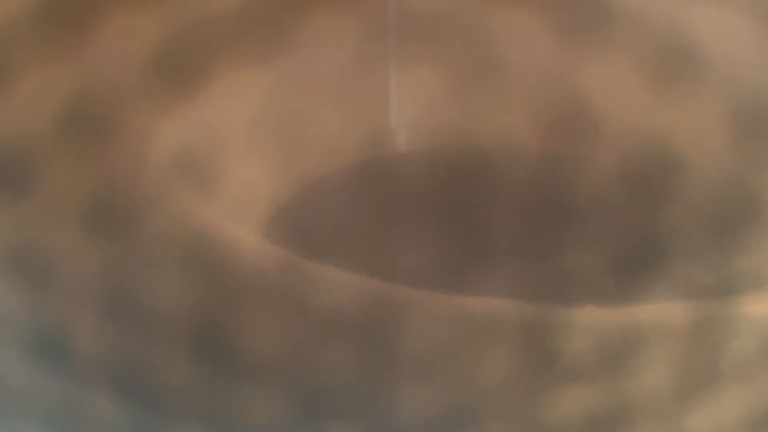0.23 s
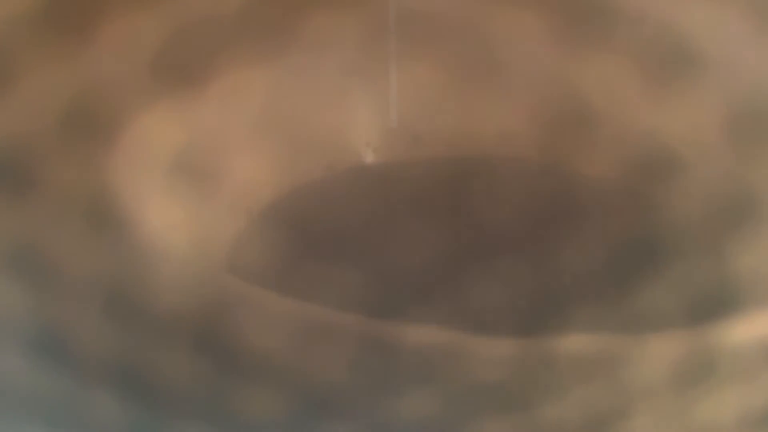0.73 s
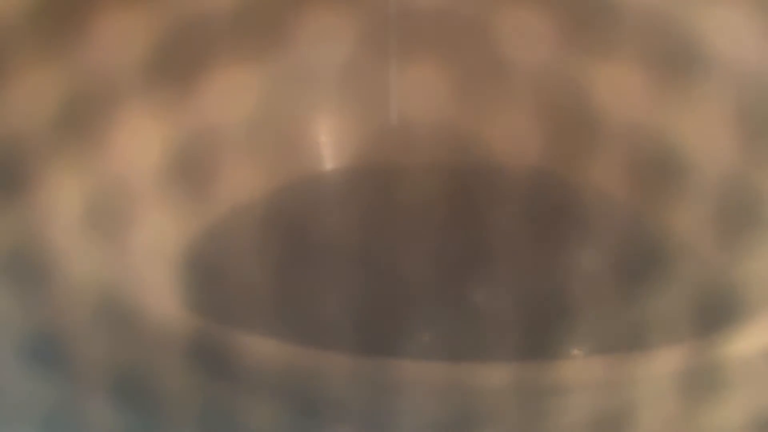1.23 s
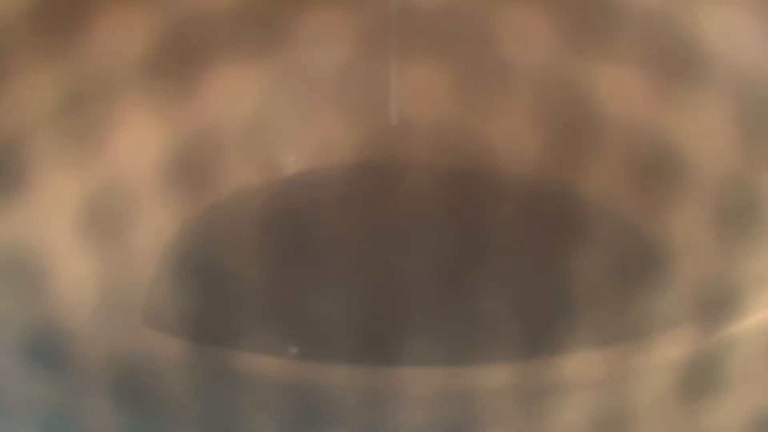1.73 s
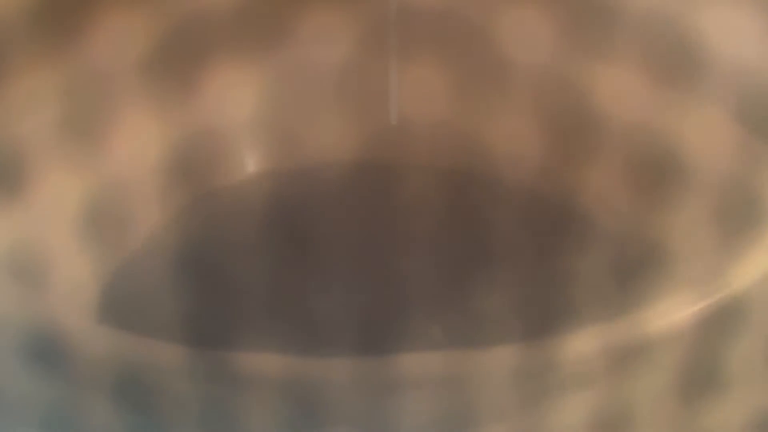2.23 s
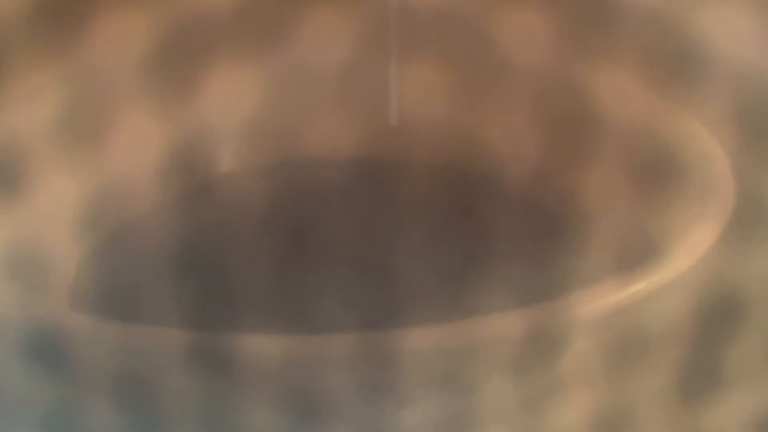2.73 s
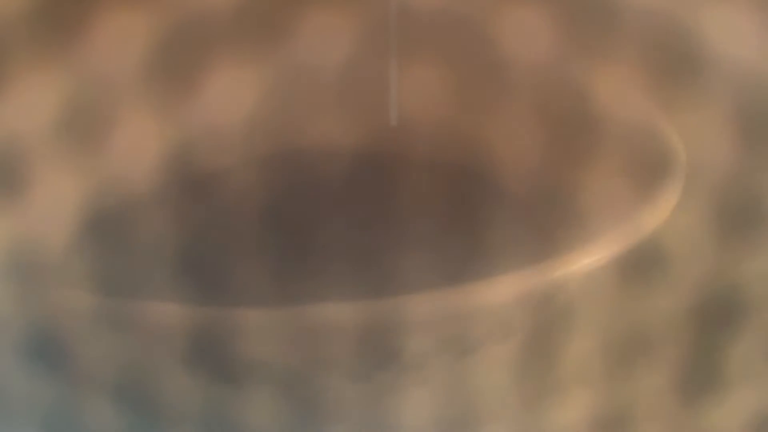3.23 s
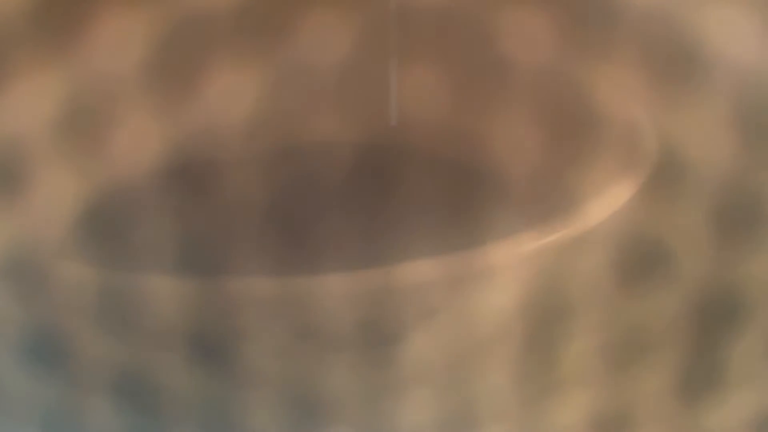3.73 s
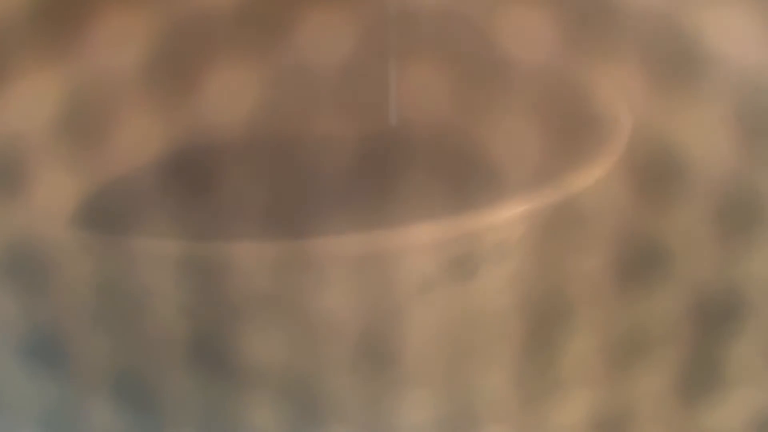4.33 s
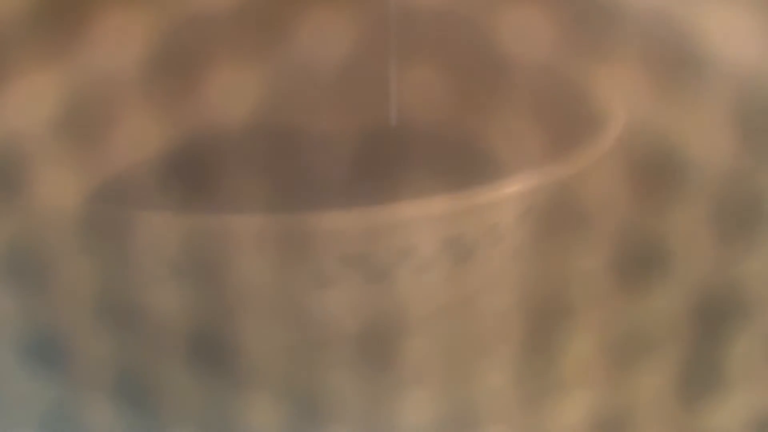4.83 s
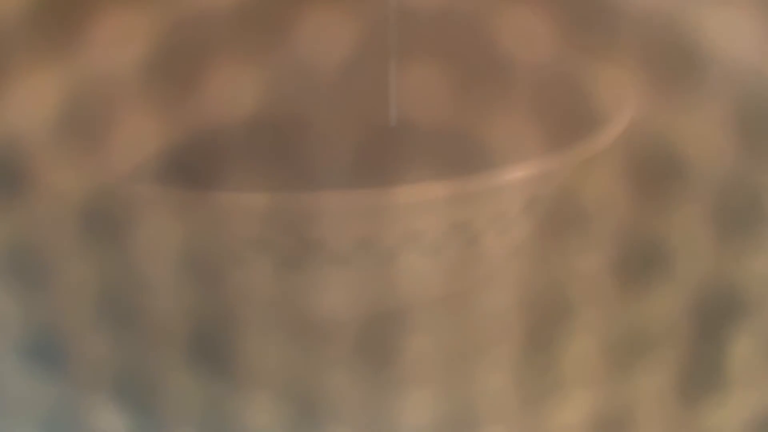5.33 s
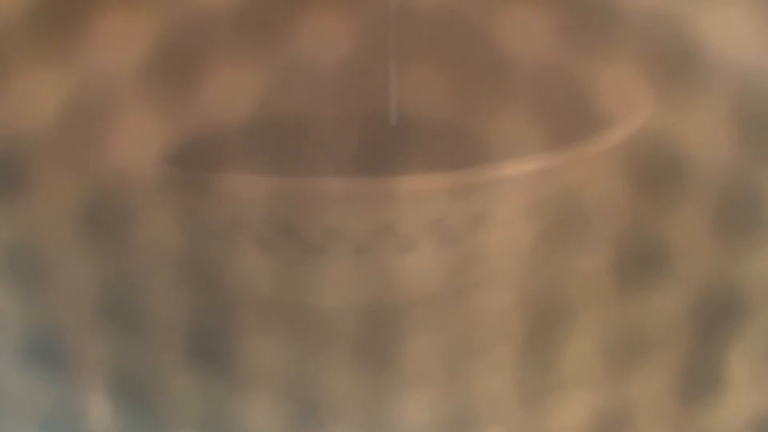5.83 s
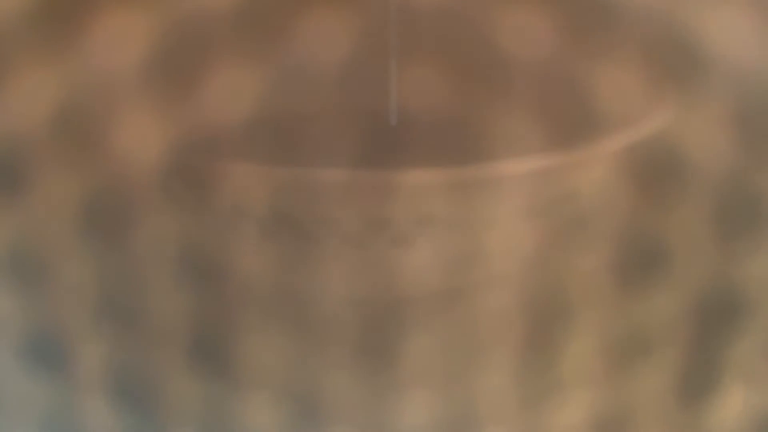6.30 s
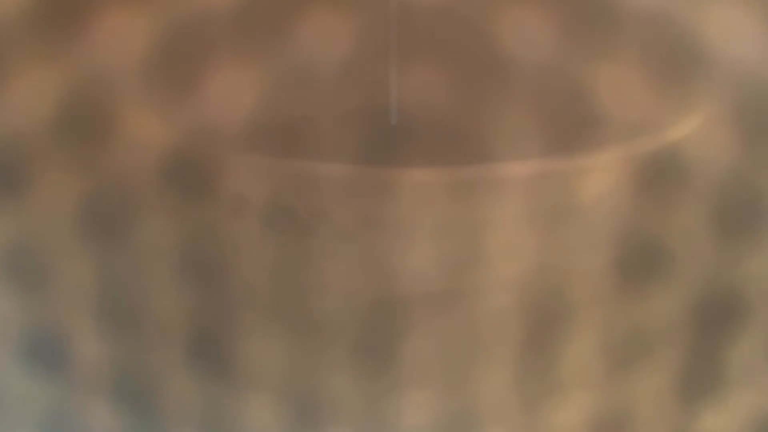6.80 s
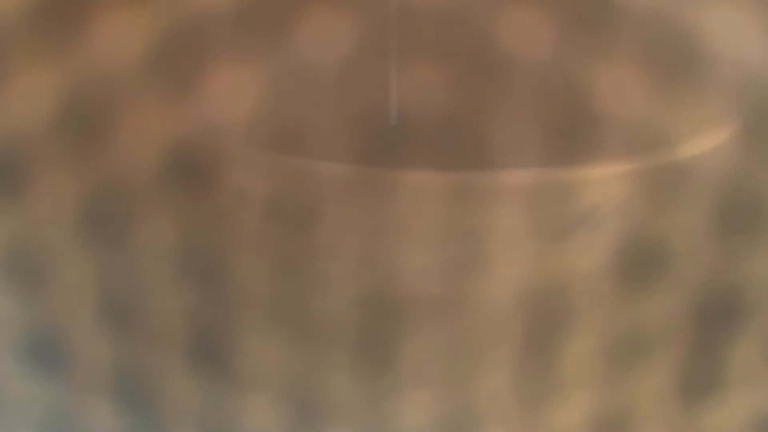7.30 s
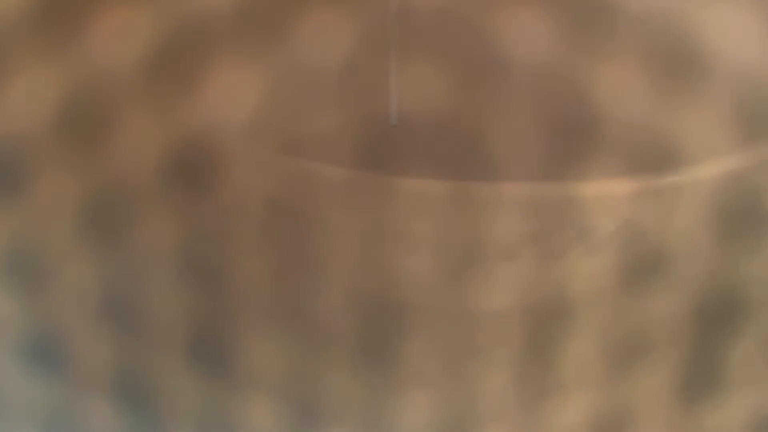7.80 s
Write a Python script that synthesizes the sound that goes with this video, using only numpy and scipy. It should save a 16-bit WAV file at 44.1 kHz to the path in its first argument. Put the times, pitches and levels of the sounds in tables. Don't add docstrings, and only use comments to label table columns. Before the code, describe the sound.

A running microwave oven hums low and steady up close, its fan droning and fluttering against the buzz, with a soft turntable whir and rushing vent air.

```python
import sys
import numpy as np
from scipy import signal
from scipy.io import wavfile
from scipy.ndimage import uniform_filter1d

SR = 44100
rng = np.random.default_rng(int(sys.argv[2]) if len(sys.argv) > 2 else 0)


def makeup_ratio(level_db):
    decades = np.asarray(level_db, float) / 20
    return 10 ** decades


def store_pcm(level_fs):
    pcm = np.round(np.clip(level_fs, -1, 1) * 32767).astype(np.int16)
    wavfile.write(sys.argv[1], SR, np.atleast_2d(pcm).T)


N = 355225

MAINS_HZ = 60.0115
PANEL_SIDE_DB, PANEL_LEAD = 1.5, .4

# time_s, speed_rpm
FAN_SPEED = [
    (0, 2267.68),
    (3.4, 2268.24),
    (4.2, 2274.44),
    (8.06, 2252.87),
]
# shaft_multiple, level_db (rms)
SHAFT_TONES = [(3, -46), (5, -53.7), (8, -47.1), (12, -53.9), (16, -61.9), (20, -68), (24, -66)]
# mains_multiple, shaft_multiple, level_db (rms)
PANEL_TONES = [(2, 4, -43.4), (4, 4, -53), (6, 4, -61), (2, 8, -56.2), (-2, 8, -52.3), (4, -4, -51.2),
               (1, 4, -54.4), (1, 2, -48.7), (2, 1, -50.4), (4, 1, -52.1), (2, 3, -49.8), (4, 2, -54.4),
               (-1, 6, -47.5), (-3, 8, -54.4)]
# frequency_hz, left_over_right_db, likeness (0-1), left_lead_rad
PORT_RESPONSE = [(25.3, 0, .45, 0), (45.7, 0.5, 1, -1.5), (141, -0.5, 1, -0.16), (350, -1.5, 0.7, 0),
                 (750, 1.5, 0.4, -0.2), (1300, 0.5, 0.3, 0), (2100, 0.5, 1, -0.65), (2940, 5.5, 0.6, 0.64),
                 (4500, 2.5, 0.8, 0), (6160, 5.5, 0.6, -0.8), (6770, 1.5, 0.9, 3.5), (7560, 0, 0.7, 3.5),
                 (9350, -1, 0.2, 1.7), (10500, 3, 1, 0), (12500, -1.5, 0.9, 0), (13800, -0.5, 0.8, 2)]


def mains(t):
    start_turns = .216
    return MAINS_HZ * t + start_turns


def shaft(t):
    start_turns = -.016
    rpm = np.interp(t, *np.transpose(FAN_SPEED))
    return np.cumsum(rpm) / 60 / SR + start_turns


def offset(a, b):
    panel_delay_s = .0045
    order, free = a / 2 + b / 4, rng.random()
    if b == 0 and a < 4:
        return (a - 2) / 10
    if a % 2 or b % 4 or min(a, b) < 0 or order > 3:
        return free
    hz = a * MAINS_HZ + b * FAN_SPEED[0][1] / 60
    return (order > 1) * (.35 * order - .18 - panel_delay_s * hz)


def drift(top_hz):
    t = np.arange(0, N, 256) / SR
    f = np.geomspace(top_hz / 12, top_hz, num=8)[:, None]
    sines = np.sin(2 * np.pi * (f * t + rng.random(f.shape)))
    x = (sines / np.sqrt(f)).sum(0)
    return np.interp(np.arange(N) / SR, t, x / x.std())


def tone(turns, db, side_db, lead):
    half = np.array([[.5], [-.5]])
    wave = np.cos(2 * np.pi * turns + lead * half)
    return np.sqrt(2) * makeup_ratio(db + side_db * half) * wave / np.cos(min(abs(lead), 2) / 2)


def read(points, hz):
    f, *columns = np.transpose(points)
    return [np.interp(np.log(hz + 1), np.log(f + 1), c) for c in columns]


def density(hz):
    # frequency_hz, density_db_per_hz
    vent_air = [(22, -84.5), (38, -70.5), (62, -62), (100, -62), (135, -54), (200, -64.5), (640, -70.5),
                (1000, -78.5), (2600, -82), (3100, -89.5), (4100, -93.5), (4700, -98.5), (5600, -100),
                (6200, -104)]
    # frequency_hz, density_db_per_hz
    top_hiss = [(6200, -105), (7000, -107), (8400, -109), (9500, -110), (10500, -114), (12250, -117),
                (12600, -128), (14000, -132), (15500, -122.5), (16500, -130)]
    # frequency_hz, width_hz, gain_db
    cabinet_modes = [(330, 44, 0), (450, 26, 1.5), (496, 21, -6.5), (710, 21, -3.5), (739, 34, -7.5),
                     (870, 91, 2.5), (1020, 22, -3), (1140, 110, 2), (1260, 47, -2.5), (1630, 74, 3),
                     (1718, 70, -5), (2290, 80, -1.5)]
    db = read(vent_air + top_hiss[1:], hz)[0]
    return db + sum(g / (1 + ((hz - f) / w) ** 2) for f, w, g in cabinet_modes)


def struck(at, force, modes, bias):
    u, out = np.arange(5000) / SR, np.zeros((2, N))
    for hz, db, t60 in modes:
        chance, blows = rng.standard_normal((len(at), 4)).T, np.zeros((2, N))
        uneven = 1 + 0.29 * chance[1] + 0.3 * chance[2:]
        blows[:, at] = force * np.sign(chance[0] + bias) * uneven
        soft_onset = 1 - np.exp(-u / 0.0035)
        ring = makeup_ratio(db - 60 * u / t60) * np.sin(2 * np.pi * hz * u) * soft_onset
        out += signal.oaconvolve(blows, ring[None])[:, :N]
    return out / out.std()


def transformer(t):
    # mains_multiple, level_db (rms), left_over_right_db, left_lead_rad
    hum_tones = [(1, -36.9, -1.0, 0.1), (2, -19.7, 0.5, 0.5), (3, -39.7, -0.8, 0.0), (4, -33.9, 4.8, 0.3),
                 (5, -55.6, 2.0, 0.2), (6, -49.6, 3.6, 0.7), (7, -55.2, 3.0, 0.8), (8, -60, 8.8, -1.8),
                 (9, -54.8, 6.8, -1.2), (10, -53.3, 1.4, -0.1)]
    # mains_multiple, swing_db, weakest_s, creep_db_per_s
    dish_load = [(4, .4, 3.5, .45), (6, 4.5, 3.8, .4), (8, 4.5, 4.5, 0), (10, 1.5, 5.4, 0)]
    swing_s = 7.0
    load_db = {}
    for k, swing_db, weakest_s, creep_db in dish_load:
        swing = swing_db * np.cos(2 * np.pi * (t - weakest_s) / swing_s)
        load_db[k] = creep_db * (t - t.mean()) - swing
    out = 0
    for k, db, side_db, lead in hum_tones:
        waver_db = .1 * (k != 2) * min(k, 9) * drift(1.5)
        out = out + tone(k * mains(t) + offset(k, 0), db + waver_db + load_db.get(k, 0), side_db, lead)
    return out


def buzz(t):
    # mains_multiple, level_db (rms)
    strong_overtones = [(11, -70), (12, -66.2), (14, -65.0), (16, -62.1), (18, -66.7), (22, -68.1),
                        (24, -68.1), (26, -61.3), (32, -66.0), (36, -65.9), (38, -69.1), (44, -70.4),
                        (64, -75), (70, -79)]
    # from_multiple, to_multiple, gain_db
    singing_sheet = (98, 108, 5.0)
    k = np.arange(11, 200)
    even = k % 2 == 0
    chance = rng.standard_normal((len(k), 4))
    db = density(k * MAINS_HZ) + 6.9 + 2.6 * even + 3.0 * np.minimum(chance[:, 0], 1) - 3.7 * (k > 108)
    low, high, gain_db = singing_sheet
    db += gain_db * even * (k > low) * (k < high)
    for multiple, rms_db in strong_overtones:
        db[k == multiple] = rms_db
    side_db, _, lead = read(PORT_RESPONSE, k * MAINS_HZ)
    side_db = side_db + 3.6 * chance[:, 1]
    lead = lead + .3 * chance[:, 2]
    start = np.where(even, .16, 9) * chance[:, 3]
    overtones = np.transpose([k, db, side_db, lead, start])
    fine = np.arange(8192) / 8192
    out = 0
    for group in range(3):
        cycle = sum(tone(m * fine + p, g, s, a) for m, g, s, a, p in overtones[group::3])
        wave = np.array([np.interp(mains(t) % 1, fine, c, period=1) for c in cycle])
        out = out + wave * makeup_ratio(1.6 * drift(1.2))
    return out


def fan(t):
    # blades, level_db (rms), left_over_right_db, left_lead_rad
    blade_tone = (4, -22.3, 2.1, .2)
    blades, db, side_db, lead = blade_tone
    out = tone(blades * shaft(t), db + .27 * drift(1.7), side_db, lead)
    for a, b, db in [(0, *row) for row in SHAFT_TONES] + PANEL_TONES:
        turns = a * mains(t) + b * shaft(t) + offset(a, b)
        out = out + tone(turns, db + 0.61 * drift(1.5), PANEL_SIDE_DB, PANEL_LEAD)
    return out


def lattice(t):
    level_db, spread_db = 4.0, 3.5
    a, b = np.arange(0, 10, 2), np.arange(1, 14)
    hz = a[:, None] * MAINS_HZ + b * FAN_SPEED[0][1] / 60
    chance = rng.standard_normal((3, *hz.shape))
    size = makeup_ratio(density(hz) + level_db + spread_db * np.clip(chance[0], -2, 1)) * (hz > 200)
    for m, n, _ in [(0, *row) for row in SHAFT_TONES] + PANEL_TONES:
        size[np.ix_(a == m, b == n)] = 0
    spin = np.exp(2j * np.pi * np.outer(b, shaft(t)[::8]))
    pull = np.exp(2j * np.pi * np.outer(a, mains(t)[::8]))
    coarse = []
    for half in (.5, -.5):
        side = half * (.5j * chance[2] + PANEL_SIDE_DB / 8.7)
        port = size * np.exp(9j * chance[1] + side)
        coarse.append(((port @ spin) * pull).sum(0).real)
    return np.sqrt(2) * signal.resample_poly(np.array(coarse), 8, 1, axis=1)[:, :N]


def gear():
    # mesh_multiple, level_db (rms), left_over_right_db, left_lead_rad
    mesh_tones = [(1, -48.5, -2, 1.2), (2, -53.5, 0.28, -1), (3, -55.5, -0.096, -2), (5, -64.5, -0.38, 0)]
    mesh_hz = 215.9
    pace = 1 + 0.00301 * drift(1.4) + .002 * drift(6.0)
    turns = np.cumsum(mesh_hz * pace) / SR
    return sum(tone(round(k) * turns, db + 1.9 * drift(2.7), side_db, lead) for k, db, side_db, lead in mesh_tones)


def bracket(t):
    # frequency_hz, level_db, t60_s
    bracket_modes = [(451, -1.5, 0.078), (568, -7.5, 0.12), (616.6, 1, 0.13), (1170, -8.5, 0.025),
                     (2070, -15.5, 0.022)]
    knock_db, depth, knock_turns = -53.5, 1, 0.075
    at = np.flatnonzero(np.diff(np.floor(shaft(t))))
    pull = 1 + depth * np.cos(2 * np.pi * (2 * mains(t[at]) + knock_turns))
    force = pull ** 2 * makeup_ratio(2.7 * drift(0.65)[at])
    return makeup_ratio(knock_db) * struck(at, force, bracket_modes, bias=0.91)


def rollers(t):
    # frequency_hz, level_db, t60_s
    tray_modes = [(805, -1, .06), (870, -3, .05), (925, 0, .06), (1560, -12, .04)]
    bumps_per_s, first_s = 15.0, .018
    level_db, settle_db_per_s = -53.5, 1.0
    s = np.arange(first_s, t[-1] - .02, 1 / bumps_per_s)
    at = np.round((s + .004 * rng.random(len(s))) * SR).astype(int)
    return makeup_ratio(level_db - settle_db_per_s * t) * struck(at, 1, tray_modes, bias=1.2)


def food(t):
    # peak_s, peak_db, centre_hz
    tick_events = [
        (1.08, -58, 13000),
        (3.916, -47, 11000),
        (4.0961, -47, 13000),
    ]
    # start_s, length_s, level_db (rms)
    sizzle_events = [
        (6.39, .05, -80),
        (6.92, .17, -74),
    ]
    ticks, puffs = np.zeros(N), np.zeros(N)
    u = np.arange(-40, 200) / SR
    decay = np.exp(-abs(u) / np.where(u < 0, 4e-5, 1e-4))
    for s, db, hz in tick_events:
        ticks[round(s * SR):][:len(u)] += makeup_ratio(db) * np.cos(2 * np.pi * hz * u) * decay
    for s, length, db in sizzle_events:
        puffs += makeup_ratio(db) * np.clip(np.minimum(t - s, s + length - t) / .03, 0, 1)
    band = signal.butter(3, [9000, 12800], "bandpass", fs=SR, output="sos")
    steam = signal.sosfilt(band, rng.standard_normal((2, N)) * .4 + rng.standard_normal(N))
    return ticks + puffs * steam / steam.std()


def air_rush():
    size, patchy_db = 4096, 1.5
    hz = np.fft.rfftfreq(size, 1 / SR)
    db = density(hz)
    a, b, c, d, patches = rng.standard_normal((N * 4 // size + 5, len(hz), 5)).T
    patches = uniform_filter1d(uniform_filter1d(patches, size=20, axis=0), size=4, axis=1)
    side_db, same, lead = (p[:, None] for p in read(PORT_RESPONSE, hz))
    same, left = np.clip(same, 0, 1), a + 1j * b
    right = same * left + np.sqrt(1 - same ** 2) * (c + 1j * d)
    right = right * np.exp(-1j * lead)
    z = np.array([left * makeup_ratio(side_db / 2), right / makeup_ratio(side_db / 2)])
    z = z * makeup_ratio(db[:, None] + patchy_db * patches / patches.std())
    x = signal.istft(z, nperseg=size, noverlap=size * 3 // 4)[1][:, :N]
    return x / x.std() * np.sqrt(np.sum(makeup_ratio(db) ** 2) * SR / size)


def scene():
    t = np.arange(N) / SR
    machine = transformer(t) + buzz(t) + fan(t) + lattice(t) + gear()
    return machine + bracket(t) + rollers(t) + food(t) + air_rush()


def roll_off(x):
    return signal.sosfilt(signal.butter(12, 15750, fs=SR, output="sos"), x)


def record(dry):
    whine_hz, whine_db = 12000, -65
    n = np.arange(N)
    whine = makeup_ratio(whine_db) * dry.mean(0) * np.cos(2 * np.pi * whine_hz * n / SR)
    opening = np.minimum(n / 80, 1)
    ending = .4 + .6 * np.sin(np.minimum((N - n) / 60, np.pi / 2))
    return roll_off((dry + whine) * opening * ending)


dry = scene()
out = record(dry)
store_pcm(out)
```